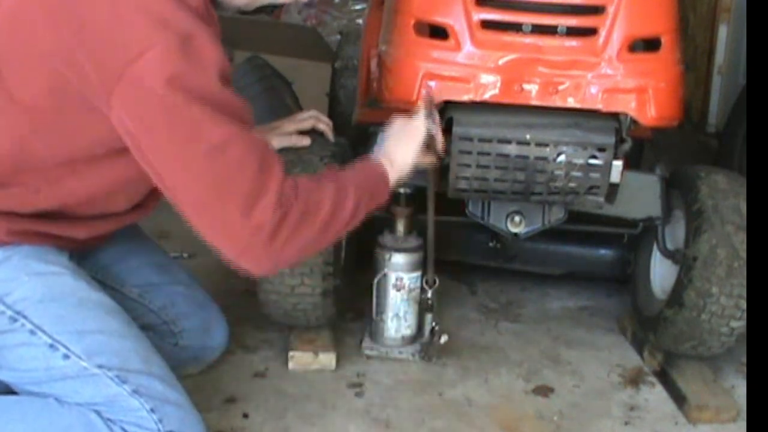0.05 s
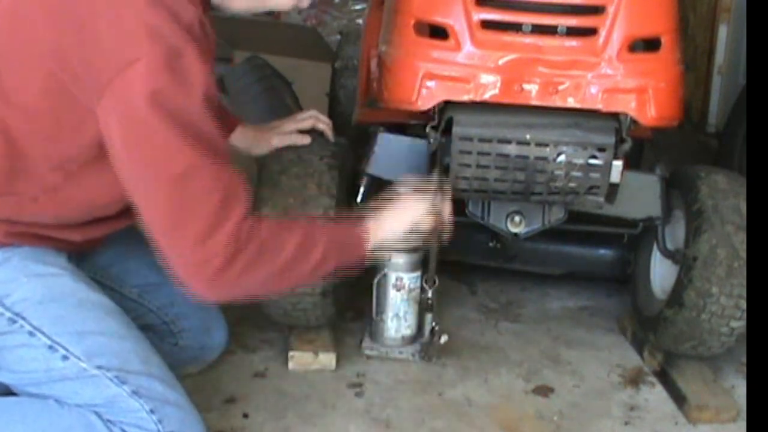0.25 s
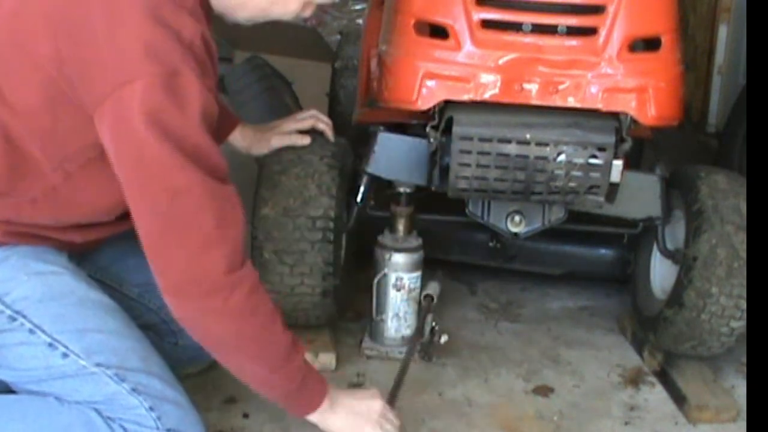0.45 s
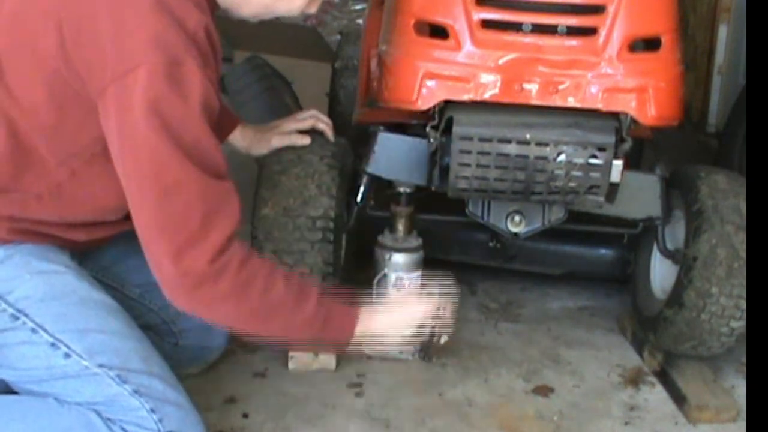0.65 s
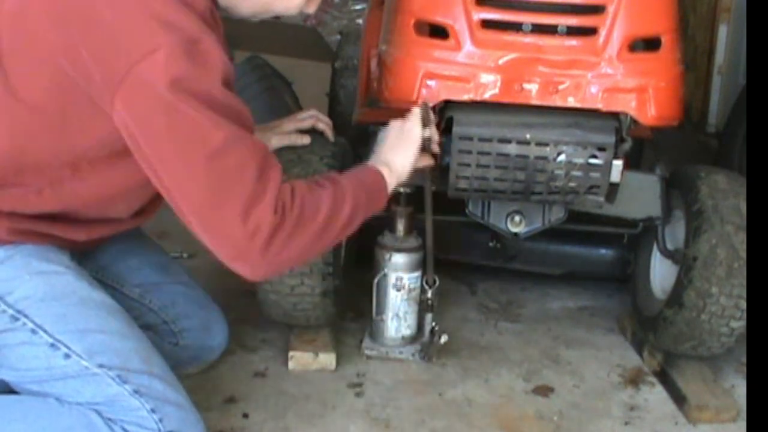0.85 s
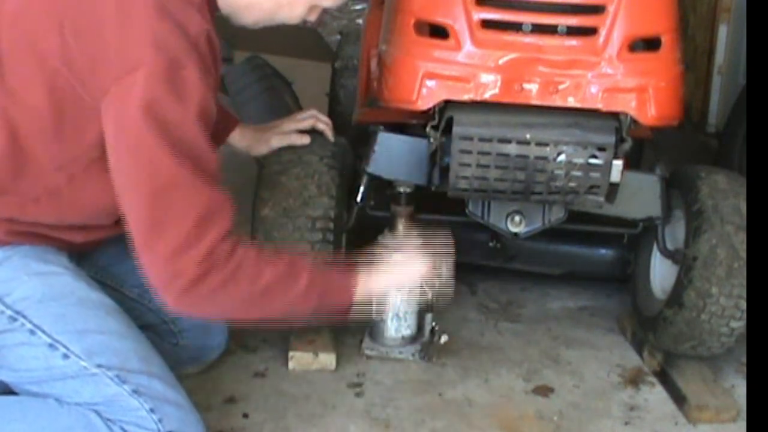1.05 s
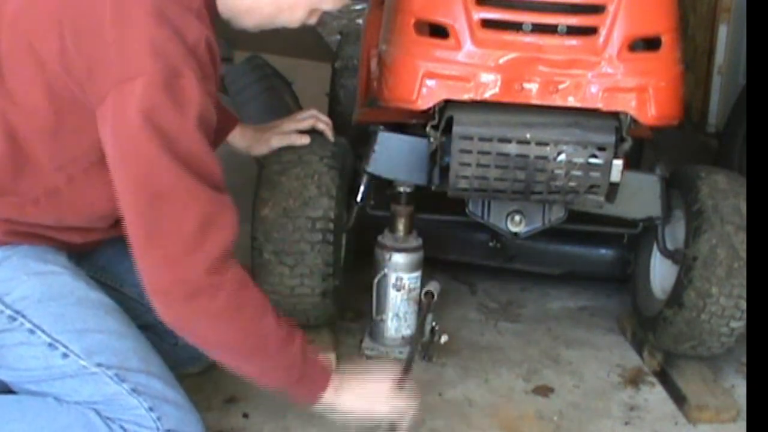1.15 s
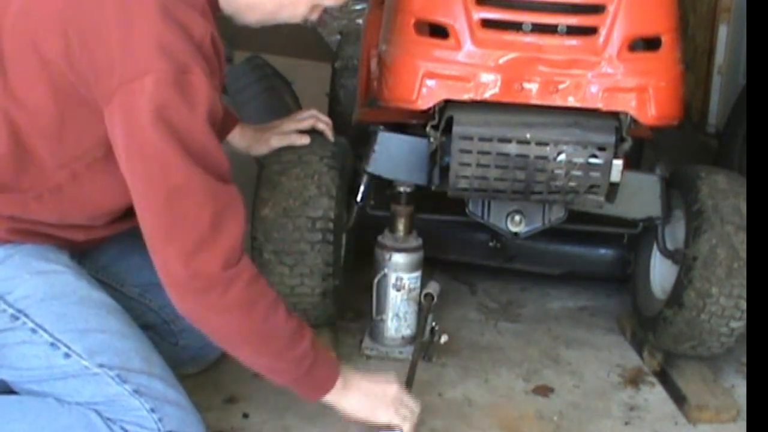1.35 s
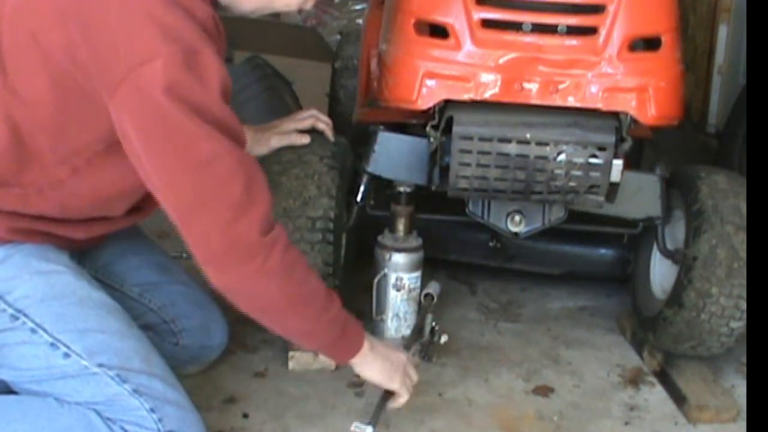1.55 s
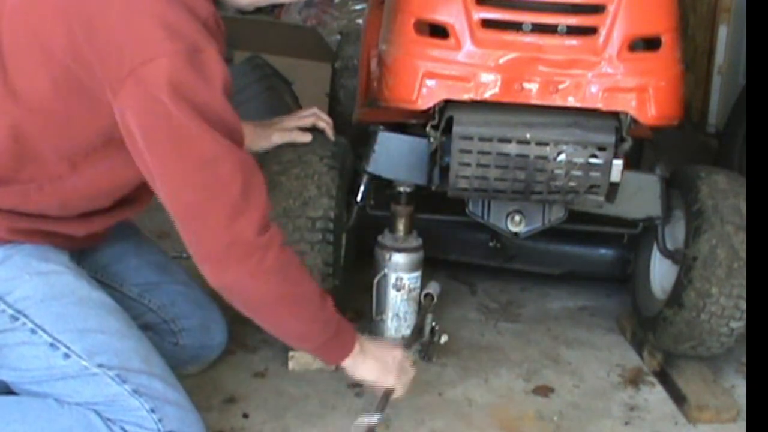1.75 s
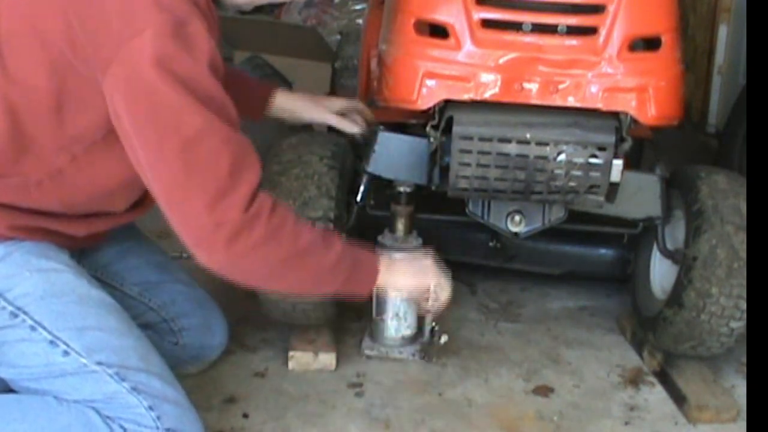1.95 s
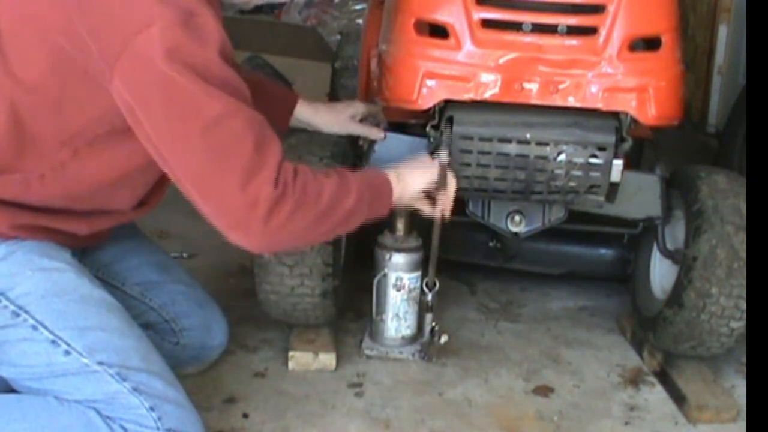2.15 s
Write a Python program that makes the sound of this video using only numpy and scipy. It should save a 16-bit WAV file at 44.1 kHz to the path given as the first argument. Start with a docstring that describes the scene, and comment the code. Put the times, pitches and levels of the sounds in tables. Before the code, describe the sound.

A steel jack handle clanks loosely as it is pumped. Faint ticks lead to a bright, rattling cluster at 0.24-0.3 s, then a sharp double clank near 0.6 s and another cluster at 1.02-1.07 s. Light steel scraping and a small tick around 1.5 s precede more clinks at 1.8-1.9 s and a short one at 2.05 s. Soft frame thuds, short garage echoes, low rumble, hiss and a faint high whine lie underneath.

```python
"""A loose steel jack handle clinks on a garage floor, a metre or two from a camcorder's microphones. Each clink
is a noise crack with paired bending modes and a short socket ring, as the handle knocks in its socket in
pumping. The lifted frame thuds as noise pushes ring its panels; filtered grainy noise is steel sliding on
steel. The garage answers with short diffuse echoes. Beneath lie rumble, hiss, a thin whine and the end of an
echo from the stroke before."""
import sys
import numpy as np
from scipy import signal
from scipy.fft import rfft, irfft
from scipy.io import wavfile

SR = 44100
rng = np.random.default_rng(int(sys.argv[2]) if len(sys.argv) > 2 else 0)


def store_wav(level_fs):
    """Save 16-bit WAV to argv[1]."""
    pcm = np.round(np.clip(np.atleast_2d(level_fs), -1, 1) * 32767)
    wavfile.write(sys.argv[1], SR, pcm.T.astype(np.int16))


N = 97020

# background spectrum, relative: pitch_hz, level_db (per Hz)
ROOM_SPECTRUM = [(25, -8), (40, -2), (62, -0.5), (120, -0.5), (250, -5.5), (500, -11.5), (1000, -13.5),
                 (2000, -19.5), (4000, -28.5), (8000, -33), (13000, -35.5), (16000, -32)]
# background side signal relative to mid: pitch_hz, level_db
ROOM_SIDE_SPECTRUM = [(60, -27), (110, -29), (200, -21), (380, -10.5), (700, -12), (1290, -7), (2380, -7),
                      (4400, -2), (8120, -4), (15000, -14)]
# steel sliding on steel, points of a level curve: time_s, level_db
SLIDE_LEVELS = [(0, -60), (.08, -73), (.3, -52), (.39, -54), (.46, -63.5), (.75, -59), (0.901, -62),
                (1.22, -60), (1.33, -60), (1.37, -49.5), (1.48, -56), (1.56, -63), (1.7, -75), (1.78, -52),
                (2.0, -62), (2.11, -63), (2.15, -51.5), (2.2, -77)]
# modes of the handle, each a close pair, before detuning: bending modes, save a short one at 4200 Hz # from the
# socket; pitch_hz, split_hz, partner_level_db (relative), t60_s (before the clink's ring length factor)
HANDLE_MODES = [(1843, 42.5, -7.5, 0.17), (2701, 48.5, -6, 0.16), (3722, -39.5, -11.5, 0.3),
                (4200, 156, -18, 0.045), (4844, 145, -1.5, 0.23), (6145, 70.5, -2.5, .2),
                (7626, -67, -5.5, 0.26), (8450, 74, -43, 0.06), (9140, -51, -5, 0.29),
                (10050, -100, -6, 0.33), (10710, 81, -12, 0.27), (12480, -400, 7, 0.11)]
# handle clinks: start_s, crack_level_db (relative), crack_centre_octaves (above 1 kHz),
# crack_width (share of centre), crack_length_s, body_clatter_db (relative to crack),
# ring_length (factor), earlier_ring_kept_db (above 0 counts as 0), then twelve ring_level_db, one a mode
CLINKS = [(0.1411, -33, 1.6, 0.8, 0.0068, -9, 0.98, -6, -56, -46, -48.5, -54, -49, -60, -65, -57, -58, -63, -59, -70),
          (0.1656, -26, 1.6, 0.99, 0.0057, -16, 1, 4, -42, -36.5, -32.5, -55, -38, -40.5, -51, -61, -51, -53, -60, -66),
          (0.2358, -8, 1.9, 1.2, 0.0044, -20, 0.88, -2, -32.5, -21, -24, -23, -29.5, -24, -16, -37, -21.5, -52, -34, -54),
          (0.2627, -27, 3.4, 1.2, 0.005, -16, 0.7, -4, -45, -23, -20.5, -37, -33, -16.5, -30, -33, -36, -42, -40, -44),
          (0.2792, -4.5, 2.4, 1.1, 0.0032, -21, 0.87, -12, -33, -25.5, -16, -36, -20, -24, -21.5, -36, -24.5, -41, -24.5, -41),
          (0.2924, -4.5, 1.97, 1.77, 0.0041, -13.5, 0.73, 5, -40, -46, -17.5, -38, -22.5, -43, -22.5, -32, -32, -39, -28, -34.5),
          (0.5038, -22.5, 1.5, 1.7, 0.0042, -13, 0.67, -6, -42, -37, -59, -41, -42.5, -38, -51, -56, -36, -58, -62, -63),
          (0.5385, -37, 1.5, 1.5, 0.0032, -16, 0.7, -15, -60, -44, -60, -58, -61, -45, -60, -61, -59, -49, -60, -57),
          (0.569, -45, 2.4, 1.2, 0.005, -16, 1, -6, -35.5, -38, -33.5, -43, -43, -48, -50, -64, -47, -60, -56, -60),
          (0.596, -7, 1.49, 1.35, 0.0051, -19.5, 0.61, -1, -22, -23, -22.5, -19, -24, -23.5, -27, -41, -26.5, -34.5, -37, -43),
          (0.636, -2.5, 2.12, 1.2, 0.0031, -29, 0.47, -22, -29, -53, -22.5, -30, -19, -20.5, -29, -37, -33, -36, -26.5, -33.5),
          (0.6514, -42, 3.9, 1.2, 0.005, -14, 0.6, -35, -45, -26.5, -55, -47, -22, -26, -28.5, -42, -41, -35, -38, -33),
          (0.9294, -36, 1.4, 0.98, 0.0045, -22, 0.95, -6, -55, -62, -43, -69, -50, -60, -46, -32.5, -46, -46, -68, -51),
          (0.937, -21, 1.54, 2, 0.0059, -13.5, 0.97, -21, -44, -31, -33.5, -65, -39, -35, -47, -46, -59, -57, -64, -57),
          (1.02, -9.5, 2.44, 1.53, 0.0077, -12, 1, -6, -32.5, -24.5, -38, -47, -23, -17, -15, -25, -29, -32, -44, -47),
          (1.047, -4, 2.96, 1.04, 0.0038, -17, 0.88, -23, -52, -25, -23, -35, -23, -40, -29, -36, -21, -26, -27, -41),
          (1.0544, -33, 4.3, 1.2, 0.0046, -20, 0.96, 3, -57, -30, -16.5, -31, -24, -26, -28, -35, -25.5, -28, -29, -37),
          (1.0724, -4, 1.96, 1.25, 0.0041, -13, 0.97, -3.5, -56, -47, -24, -36, -26, -54, -27, -41, -38, -36, -30.5, -40),
          (1.508, -26.5, 1.65, 0.48, 0.007, -12, 0.26, -6, -61, -34.5, -41, -51, -50, -43, -42.5, -61, -50, -62, -50, -61),
          (1.5849, -38, 2, 1.3, 0.005, -18, 0.52, -6, -45, -38.5, -56, -62, -46, -44, -56, -67, -65, -68, -68, -67),
          (1.7262, -48, 3.4, 1.2, 0.0063, -13, 0.7, -6, -59, -47, -70, -66, -54, -52, -49, -63, -54, -67, -66, -61),
          (1.7403, -49, 1.2, 1.2, 0.005, -12, 1, -13, -51, -50, -64, -67, -52, -50, -46, -56.5, -46.5, -63, -64, -64),
          (1.8022, -18.5, 1.9, 1.6, 0.005, -16, 0.94, -4, -42, -49, -29, -29, -18, -25, -26.5, -31, -25, -51, -32.5, -47),
          (1.8144, -13, 2.38, 1.4, 0.0041, -16, 0.56, -12.5, -37, -39, -25.5, -13, -46, -45, -30, -21.5, -39, -49, -38, -39),
          (1.8364, -15, 1.93, 1.3, 0.0042, -15, 0.85, 3, -34, -32.5, -30, -37, -36, -32, -42, -38, -45, -50, -38, -44),
          (1.904, -7, 2, 1.44, 0.0046, -20, 0.31, -8, -43, -21, -18, -13, -21.5, -27, -9.5, -11, -23.5, -28, -28, -37),
          (1.9194, -33, 4, 0.89, 0.005, -14, 0.43, -24, -56, -38, -47, -39, -38, -28, -38, -41, -29, -41, -29, -37),
          (2.0531, -16.5, 2.37, 1.27, 0.003, -19.5, 0.23, -6, -52, -60, -59, -17, -26.5, -24.5, -54, -54, -67, -62, -72, -57)]
# panels of the lifted frame: pitch_hz, level_db (relative), t60_s
FRAME_PANELS = [(260, -18.5, .08), (301, -13, 0.098), (389, -12, 0.063), (510, -6, 0.069),
                (566, -5.5, 0.063), (614, -4.5, 0.071), (690, -10, 0.069), (741, -15, 0.04),
                (785, -4.5, 0.049), (860, -16, .05), (1000, -4.5, 0.033), (1107, -6, .06)]
# frame thuds: start_s, level_db (relative), centre_hz, push_length_s
THUDS = [(.262, -37.5, 1020, 0.012), (.290, -32.5, 580, 0.024), (.411, -31, 302, 0.0077),
         (.416, -43.5, 710, 0.013), (.600, -45, 780, 0.016), (.640, -45.5, 855, 0.011),
         (1.054, -32, 722, 0.022), (1.803, -49.5, 1130, 0.012), (1.836, -46.5, 1020, 0.0065),
         (2.068, -48.5, 740, 0.02)]
# garage echo bands: pitch_hz, t60_s, level_db (relative)
GARAGE_BANDS = [(416, 1, -19), (935, 1, -17.5), (2070, 0.47, -6), (3960, 0.27, -10), (7000, 0.35, -7.5),
                (11900, 0.3, -7.5)]

ROOM_DB, ROOM_SWAY_DB, ROOM_SWAY_HZ = -45, 0.7, 2.95
WHINE_HZ, WHINE_DB = 15734, -74
EARLIER_DB, EARLIER_DECAY_S, EARLIER_HZ = -47, 0.05, 3900
SLIDE_HZ, SLIDE_WIDTH_HZ = 10050, 6200
SLIDE_RING_DB, SLIDE_GRAIN_DB = -13, 1.5  # handle ring against hiss; spread of the grain
RING_DB, RING_RISE_S = -3.5, 0.0011
DETUNE, EAR_TWIST_RAD = 0.00373, 0.31  # spreads: share of pitch; phase, opposite in the two ears
SNAP, SNAP_S = 0.7, 0.0041  # extra ring that dies at once: share, decay
RATTLE, RATTLE_HZ = 0.52, 86.5  # loose fit makes each mode waver: depth, upper rate
CRACK_DB, CRACK_TOP_HZ = -13, 11900
TICK, TICK_S = 0.56, 0.0002  # sharp first tick of a crack: share, decay
CLATTER_S = 0.029  # decay of the jack body's clatter
PANEL_OCTAVE_DB = -24.5  # change one octave from the centre, growing as octaves squared
BOXY_DB, BOXY_DECAY_S = -5, 0.05  # boxy rumble beside the panels
GARAGE_RISE_S, GARAGE_ALIKE, RING_SEND_DB = 0.0013, 0.79, -8
PAN_DB = 2.0  # right above left
TOP_HZ = 15850


def undb(db):
    """dB to gain."""
    return 10 ** (np.asarray(db) / 20)


def band(x, hz, width):
    """Two-pole resonance, gain 1 at its centre, which is capped below the top of the range."""
    return signal.lfilter(*signal.iirpeak(min(hz, .42 * SR), hz / width, fs=SR), x)


def unit(x):
    """Scale to rms 1."""
    return x / np.sqrt(np.mean(x ** 2))


def colour(n, pitch_hz, level_db):
    """Noise shaped to a spectrum that is straight in dB over log frequency."""
    f = np.maximum(np.arange(n // 2 + 1) * SR / n, 1)
    gain = undb(np.interp(np.log(f), np.log(pitch_hz), level_db))
    return irfft(rfft(rng.standard_normal(n)) * gain, n)


def walk(cutoff_hz):
    """Random wandering around 0, rms 1, smoothed above the cutoff."""
    return unit(signal.lfilter(*signal.butter(2, cutoff_hz, fs=SR), rng.standard_normal(N)))


def add(out, start_s, x):
    """Mix x into out from start_s on."""
    i = int(start_s * SR)
    out[..., i:i + x.shape[-1]] += x[..., :N - i]


def background():
    """Swaying noise, most alike in both ears at the bottom, with a steady whine at the top."""
    hz, mid_db = np.array(ROOM_SPECTRUM).T
    side_hz, side_db = np.array(ROOM_SIDE_SPECTRUM).T
    mid = colour(N, hz, mid_db)
    side = colour(N, hz, mid_db + np.interp(np.log(hz), np.log(side_hz), side_db))
    gain = undb(ROOM_DB + ROOM_SWAY_DB * walk(ROOM_SWAY_HZ)) / np.std(mid)
    whine = undb(WHINE_DB) * np.sin(2 * np.pi * WHINE_HZ * np.arange(N) / SR)
    return gain * np.array([mid + side, mid - side]) + whine


def earlier_echo():
    """The last echo of the stroke before: band noise, partly shared by the ears, dying from the start."""
    hiss = unit(band(rng.standard_normal((2, N)), EARLIER_HZ, EARLIER_HZ))
    shared = hiss.sum(axis=0)
    decay = np.exp(-np.arange(N) / SR / EARLIER_DECAY_S)
    return undb(EARLIER_DB) * (hiss + shared) / 2 * decay


def slide():
    """Steel on steel: grainy noise makes a high hiss and also strokes the handle modes."""
    time_s, level_db = np.array(SLIDE_LEVELS).T
    grit = rng.standard_normal(N) * undb(SLIDE_GRAIN_DB * walk(40))
    hiss = unit(band(band(grit, SLIDE_HZ, SLIDE_WIDTH_HZ), SLIDE_HZ, SLIDE_WIDTH_HZ))
    rung = unit(sum(band(grit, hz, abs(split)) for hz, split, _, _ in HANDLE_MODES))
    level = undb(np.interp(np.arange(N) / SR, time_s, level_db))
    return level * (hiss + undb(SLIDE_RING_DB) * rung)


def ring_left():
    """Running total in dB of the choking by all clinks so far; each contact damps the earlier ring."""
    left_db = np.zeros(N + SR // 2)
    for start_s, _, _, _, _, _, _, kept_db, *_ in CLINKS:
        left_db[int(start_s * SR)] += min(kept_db, 0)
    return np.cumsum(left_db)


def handle_ring():
    """Each clink starts beating pairs of decaying modes, mostly the handle's bending modes with one short
    socket ring, which later clinks choke."""
    hz, split, partner_db, t60 = np.array(HANDLE_MODES).T[:, :, None]
    t = np.arange(SR // 2) / SR
    left_db = ring_left()
    ring = np.zeros((2, len(HANDLE_MODES), N))
    ear = np.array([1, -1])[:, None, None]
    for start_s, _, _, _, _, _, lasting, _, *ring_db in CLINKS:
        i = int(start_s * SR)
        off, turn, twist, partner_twist = rng.standard_normal((4, len(HANDLE_MODES), 1))
        f = hz * (1 + DETUNE * off)
        main = np.sin(2 * np.pi * f * t + EAR_TWIST_RAD * ear * twist)
        partner_phase = 2 * turn + EAR_TWIST_RAD * ear * partner_twist
        partner = undb(partner_db) * np.sin(2 * np.pi * (f + split) * t + partner_phase)
        fade = undb(np.array(ring_db)[:, None] - 60 * t / (t60 * lasting))
        attack = (1 + SNAP * np.exp(-t / SNAP_S)) * (1 - np.exp(-t / RING_RISE_S))
        choke = undb(left_db[i:i + len(t)] - left_db[i])
        add(ring, start_s, (main + partner) * fade * attack * choke)
    waver = np.array([1 + RATTLE * walk(RATTLE_HZ) for _ in HANDLE_MODES])
    return undb(RING_DB) * (ring * waver).sum(axis=1)


def handle_crack():
    """Each contact is a burst of band noise with a sharp tick, then the jack body's longer clatter."""
    t = np.arange(SR // 2) / SR
    crack = np.zeros(N)
    for start_s, level_db, octaves, broad, length_s, clatter_db, *_ in CLINKS:
        centre_hz = 1000 * 2 ** octaves
        width_hz = broad * centre_hz
        burst = band(band(rng.standard_normal(len(t)), centre_hz, width_hz), centre_hz, width_hz)
        snap = np.exp(-t / length_s) + TICK * np.exp(-t / TICK_S)
        clatter = undb(clatter_db) * np.exp(-t / CLATTER_S)
        add(crack, start_s, undb(level_db) * unit(burst) * (snap + clatter))
    soft = signal.butter(8, CRACK_TOP_HZ, fs=SR, output="sos")
    return undb(CRACK_DB) * signal.sosfilt(soft, crack)


def frame():
    """A rough, soft push rings the lifted frame's panels near its centre, with a boxy rumble."""
    out, t = np.zeros(N), np.arange(SR // 2) / SR
    for start_s, level_db, centre_hz, push_s in THUDS:
        push = band(rng.standard_normal(len(t)), centre_hz, 2 * centre_hz)
        push = band(push * t * np.exp(-2 * t / push_s), centre_hz, centre_hz)
        push = push / np.sqrt(np.sum(push ** 2))
        panels = np.zeros(len(t))
        for hz, panel_db, t60 in FRAME_PANELS:
            reach_db = PANEL_OCTAVE_DB * np.log2(hz / centre_hz) ** 2
            panels += undb(panel_db + reach_db - 60 * t / t60) * np.sin(2 * np.pi * hz * t)
        rumble = band(rng.standard_normal(len(t)), centre_hz, centre_hz / 2)
        rumble = unit(band(rumble, centre_hz, centre_hz / 2))
        boxy = undb(BOXY_DB) * rumble * (1 - np.exp(-t / push_s)) * np.exp(-t / BOXY_DECAY_S)
        add(out, start_s, undb(level_db) * (signal.fftconvolve(push, panels)[:len(t)] + boxy))
    return out


def garage(x):
    """Diffuse echo: noise bands decay at their own rates, partly alike in both ears."""
    t = np.arange(int(.7 * SR)) / SR
    tail = np.zeros((2, len(t)))
    for hz, t60, level_db in GARAGE_BANDS:
        part = band(rng.standard_normal((2, len(t))), hz, hz / 1.5) * undb(-60 * t / t60)
        tail += undb(level_db) * part / np.sqrt(np.sum(part ** 2))
    mid, side = tail * (1 - np.exp(-t / GARAGE_RISE_S))
    side = np.sqrt(1 - GARAGE_ALIKE) * side
    return signal.fftconvolve(x[None], np.array([mid + side, mid - side]))[:, :N]


def scene():
    """The jack and its echo sit a little to the right, over the unpanned background."""
    sliding = slide()
    ring = handle_ring()
    dull = handle_crack() + frame() + sliding  # everything but the handle's ring
    echo = garage(dull + undb(RING_SEND_DB) * ring.mean(axis=0))
    pan = undb(np.array([[-PAN_DB], [PAN_DB]]) / 2)
    return (ring + dull + echo) * pan + background() + earlier_echo()


def record(dry):
    """The camcorder cuts the top with a steep low-pass."""
    return signal.sosfilt(signal.ellip(8, .2, 70, TOP_HZ, fs=SR, output="sos"), dry)


dry = scene()
out = record(dry)
store_wav(out)
```